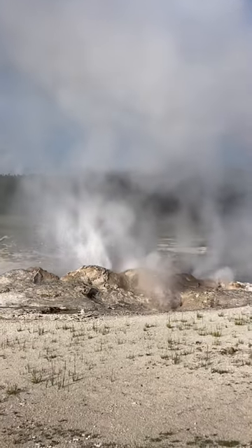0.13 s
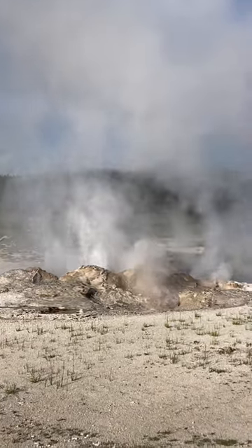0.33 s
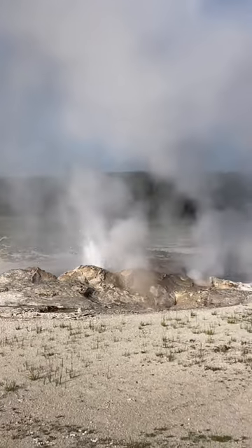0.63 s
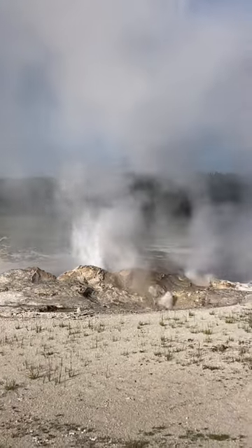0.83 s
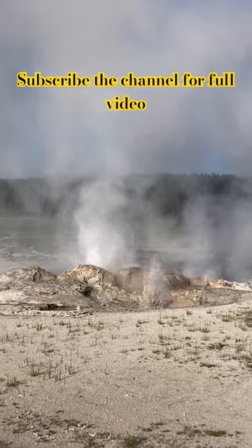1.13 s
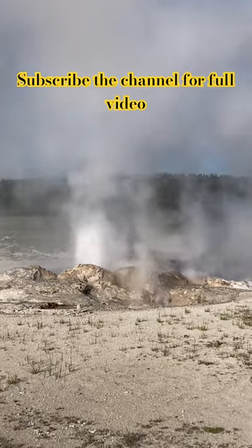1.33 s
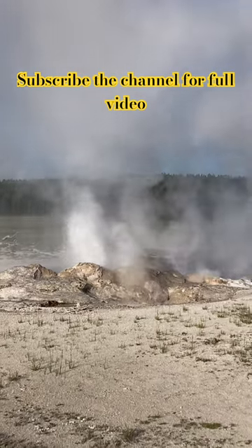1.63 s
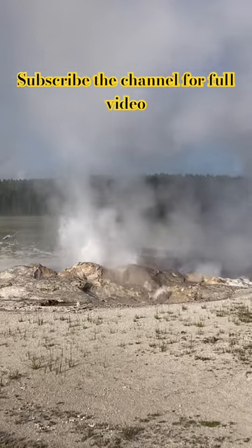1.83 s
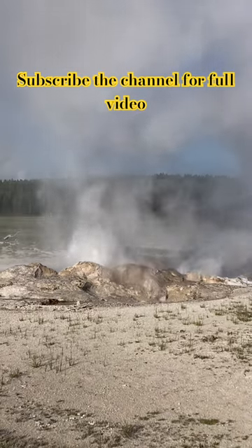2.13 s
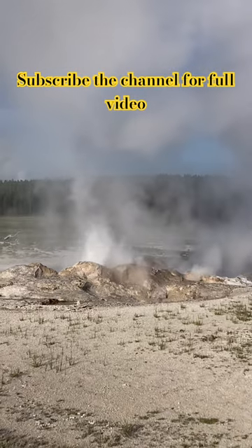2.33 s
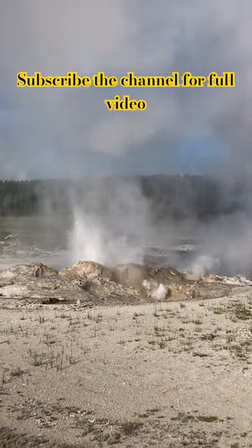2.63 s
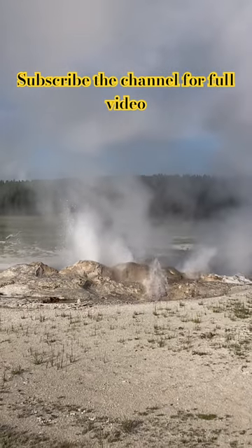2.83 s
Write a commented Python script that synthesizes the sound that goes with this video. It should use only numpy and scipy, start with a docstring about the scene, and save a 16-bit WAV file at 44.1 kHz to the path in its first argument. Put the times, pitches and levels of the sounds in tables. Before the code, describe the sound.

Geyser rumbling, gurgling and hissing at some distance on open ground, with a brief early breeze

```python
"""A deep rumble and churning gurgle under a steady hiss: a small geyser boils some way off on open ground.
Steam bubbles rumble and churn in the vent, water sloshes over its rim, and the jet and its spray hiss;
these are noise and random impulses, shaped in spectrum and level and heard by two closely spaced microphones.
Big bubbles thump and slaps of water plop as short tones; near drops tick on the crust as bursts of noise.
At first a breeze makes the bass wide; then the bass narrows to mono. Now and then the gurgle swings wide."""
import sys
import numpy as np
from scipy import signal
from scipy.fft import rfft, irfft
from scipy.io import wavfile

SR = 44100
rng = np.random.default_rng(int(sys.argv[2]) if len(sys.argv) > 2 else 0)


def transcribe(u):
    """Save the signal u as a 16-bit wav file named by the first command-line argument.

    u: samples, shape (n,) or (channels, n), limited to [-1, 1]; the rate is SR.
    q: integer samples, one column per channel.
    """
    v = np.clip(np.atleast_2d(u).T, -1, 1)
    q = np.round(v * 32767).astype(np.int16)
    wavfile.write(sys.argv[1], SR, q)


N = 132300  # samples, three seconds
FRAME = 512  # samples in each short-time spectrum of the water


def gain_of(db):
    """Decibel law: 20 dB is a factor of ten in amplitude."""
    return 10 ** (np.asarray(db) / 20)


def evened(x):
    """Power normalisation: scales to an rms of one."""
    return x / np.sqrt(np.mean(x ** 2) + 1e-20)


def read(points, hz):
    """Logarithmic frequency scale: interpolates a table evenly in pitch."""
    f, value = np.transpose(points)
    return np.interp(np.log(hz + 1), np.log(f + 1), value)


def level(table, order=1):
    """Amplitude envelope: one dB column of a time table as a gain for every sample."""
    columns = np.transpose(table)
    return gain_of(np.interp(np.arange(N) / SR, columns[0], columns[order]))


def add(mix, s, sound):
    """Superposition: adds a sound to the mix from time s in seconds."""
    part = mix[max(round(s * SR), 0):][:len(sound)]
    part += sound[:len(part)]


def patches(width_hz, length_s):
    """Correlated fluctuation: white noise smoothed over frequency and time into swelling patches."""
    z = np.fft.rfft2(rng.standard_normal((FRAME // 2 + 1, 4 * N // FRAME + 8)))
    across = np.fft.fftfreq(len(z), SR / FRAME)[:, None] * width_hz
    along = np.linspace(0, 2 * SR / FRAME, z.shape[1]) * length_s
    smoothing = 1 / (1 + (2 * across) ** 2) / np.sqrt(1 + (2 * along) ** 4)
    return evened(np.fft.irfft2(z * smoothing))


def bursts_and_rush(per_s, spread_db, grain_share):
    """Shot noise: random impulses of uneven size over Gaussian noise, shared out by power."""
    happens = rng.random(N) < per_s / SR
    size = gain_of(spread_db * np.minimum(rng.exponential(1, N), 4)) * happens
    bursts = evened(size * rng.choice([-1., 1.], (2, N)))
    rush = rng.standard_normal((2, N))
    share = np.clip(grain_share, 0, 1)
    return np.sqrt(share) * bursts + np.sqrt(1 - share) * rush


# Likeness of left and right. Each row: frequency in Hz, likeness from 0 to 1.
LIKENESS = [(30, .92), (70, .84), (220, .8), (320, .8), (430, .45), (560, .35), (800, .78), (1030, .3),
            (1250, .72), (1750, .8), (2300, .78), (2800, .45), (3700, .66), (4500, .3), (5300, .995),
            (6100, .995), (6800, .8), (7700, .995), (9000, .995), (10200, .8), (11100, .995), (12400, .995),
            (13200, .75), (14300, .995)]
# Phase between left and right. Each row: frequency in Hz, lead of the left in radians.
LEFT_LEAD = [(60, 0), (310, 0), (500, -2.6), (640, -.5), (960, -1.7), (1100, .3), (1650, .5), (2000, 1.3),
             (2650, 1.8), (2950, .1), (4400, .1), (4700, 2.5), (5300, 3.1), (6150, 3.2), (6450, 4.2),
             (7300, 5), (7700, 6.2), (9100, 6.35), (10400, 8), (11200, 9.35), (12400, 9.5), (14200, 12.5),
             (15500, 12.6)]
# Level difference of left and right. Each row: frequency in Hz, left minus right in dB.
LEFT_MINUS_RIGHT = [(60, -0.5), (330, 1), (500, -3.5), (850, 0), (1050, -7), (1400, -1.5), (2600, 0),
                    (2950, 2.5), (3400, 0.5), (4800, -0.5), (6400, 0), (15000, 0)]


def stereo_pair(a, b, hz):
    """Stereo likeness: two independent spectra blend into partly alike, offset left and right."""
    same = np.clip(read(LIKENESS, hz), 0, 1)
    tilt = gain_of(read(LEFT_MINUS_RIGHT, hz) / 2)
    right = (same * a + np.sqrt(1 - same ** 2) * b) * np.exp(-1j * read(LEFT_LEAD, hz))
    return np.array([a * tilt, right / tilt])


def water(spectrum, per_s, spread_db, grain_share, patchy_db, width_hz, length_s):
    """Stochastic superposition: small bursts over a rush, swelling in patches, in left and right."""
    x = bursts_and_rush(per_s, spread_db, grain_share)
    overlap = FRAME - FRAME // 4
    z = signal.stft(x, nperseg=FRAME, noverlap=overlap)[2]
    z = z * gain_of(patchy_db * patches(width_hz, length_s)[:, :z.shape[2]])
    patchy = signal.istft(z, nperseg=FRAME, noverlap=overlap)[1][:, :N]
    a, b = rfft(patchy)
    hz = np.fft.rfftfreq(N, 1 / SR)
    pair = stereo_pair(a, b, hz)
    return evened(irfft(pair * gain_of(read(spectrum, hz)), N))


# Deep rumble spectrum. Each row: frequency in Hz, relative density in dB per Hz.
RUMBLE_SPECTRUM = [(15, -28), (30, -17), (48, -1), (70, -0.5), (97, -1.5), (140, -5.5), (220, -19.5),
                   (400, -54), (900, -53.5)]
# Churning bubble spectrum. Each row: frequency in Hz, relative density in dB per Hz.
CHURN_SPECTRUM = [(60, -22), (110, -1), (160, 1), (240, 0.5), (300, -4.5), (370, -11.5), (450, -19),
                  (600, -14), (1000, -41)]
# Boiling strength. Each row: time in seconds, relative churn level in dB, relative rumble level in dB.
BOILING_LEVEL = [(0, -48, -46.5), (.12, -51, -45), (.25, -62, -43), (.42, -55, -49), (.6, -49, -48),
                 (.8, -48, -43.5), (1, -43, -42), (1.18, -46.5, -42), (1.27, -39, -43),
                 (1.35, -42.5, -48.5), (1.5, -44, -43.5), (1.7, -41.5, -43.5), (1.92, -46, -41),
                 (2.05, -42, -45), (2.25, -45.5, -41.5), (2.55, -43, -46), (2.85, -41.5, -41.5),
                 (3, -44.5, -41)]


def boiling():
    """Bubble noise: steam bubbles add up to a deep rumble with a churning gurgle above it."""
    rumble = water(RUMBLE_SPECTRUM, per_s=200, spread_db=1.5, grain_share=0.36,
                   patchy_db=-1.0, width_hz=230, length_s=0.2)
    churn = water(CHURN_SPECTRUM, per_s=200, spread_db=0.5, grain_share=0.56,
                  patchy_db=0.5, width_hz=990, length_s=0.068)
    deep = gain_of(2.5) * rumble * level(BOILING_LEVEL, order=2)
    return deep + gain_of(-0.7) * churn * level(BOILING_LEVEL)


# Big steam bubbles. Each row: start in seconds, pitch in Hz, length in seconds, peak level in dB.
BIG_BUBBLES = [(0.164, 82, 0.054, -34), (0.825, 152, 0.04, -38.5), (0.988, 102.4, 0.072, -38.5),
               (1.076, 233, 0.032, -39), (1.25, 108, 0.03, -33.5), (1.63, 217, 0.037, -35),
               (1.869, 62, 0.073, -42), (2.267, 92, 0.039, -31), (2.391, 146, 0.051, -31.5),
               (2.648, 210, 0.028, -37), (2.804, 90.6, 0.083, -36.5)]


def thumps(rise=0.083):
    """Bubble pulsation: a big steam bubble swells and collapses as a tone rising by a small fraction."""
    out = np.zeros(N)
    for start, hz, length, db in BIG_BUBBLES:
        u = np.arange(0, length, 1 / SR) / length  # progress from 0 to 1
        turns = np.cumsum(hz * (1 + rise * (u - .5))) / SR + rng.random()
        swell = np.sin(np.pi * u ** 1.23)
        add(out, start, gain_of(db) * swell * np.sin(2 * np.pi * turns))
    return out


# Slosh spectrum. Each row: frequency in Hz, relative density in dB per Hz.
SLOSH_SPECTRUM = [(150, -4.5), (330, -8.5), (480, -2), (630, 1), (790, 1), (930, -17.5), (1300, -15),
                  (3000, -34)]
# Slosh strength. Each row: time in seconds, relative level in dB.
SLOSHING = [(0, -57.5), (.09, -51), (.18, -58.5), (.29, -51), (.39, -55), (.46, -55), (.6, -57.5),
            (.8, -57), (.96, -57.5), (1.15, -55.5), (1.5, -57), (1.7, -54), (1.85, -56), (2.25, -54),
            (2.47, -51.5), (2.9, -53), (3, -60)]


def slosh():
    """Splash noise: water slopping over the rim sounds as patchy mid-band noise."""
    noise = water(SLOSH_SPECTRUM, per_s=200, spread_db=0.6, grain_share=0.42,
                  patchy_db=3.0, width_hz=290, length_s=0.037)
    return gain_of(1.5) * noise * level(SLOSHING)


# Water slapping back into the pool. Each row: start in seconds, pitch in Hz, relative level in dB.
SLAPS = [(.352, 356, -42), (.442, 623, -44.5), (.455, 273, -41), (.955, 689, -43.5), (1.47, 726, -48),
         (2.32, 347, -43), (2.48, 787, -48), (2.64, 524, -47.5)]
PLOP_RISE_S, PLOP_DECAY_S, PLOP_SCATTER_S = 0.0016, 0.0076, 0.02
PLOP_SPREAD = 0.1  # largest pitch offset, as a fraction


def plops(count=5):
    """Bubble resonance: each slap traps a small cluster of bubbles that ring briefly."""
    out, t = np.zeros(N), np.arange(4096) / SR
    envelope = (1 - np.exp(-t / PLOP_RISE_S)) * np.exp(-t / PLOP_DECAY_S)
    for start, hz, db in SLAPS:
        for k, (late, size) in enumerate(rng.random((count, 2))):
            pitch = hz * (1 + PLOP_SPREAD * (2 * size - 1))
            ring = np.sin(2 * np.pi * pitch * t)
            add(out, start + PLOP_SCATTER_S * (k + late) / count, gain_of(db) * envelope * ring)
    return out


# Steam jet spectrum. Each row: frequency in Hz, relative density in dB per Hz.
JET_SPECTRUM = [(400, -24), (800, 1.5), (950, -2.5), (1100, -0.5), (1400, -4.5), (1700, -.5), (2000, -7),
                (2300, 0.5), (2650, -8.5), (3000, -3), (3300, -8), (3750, -6.5), (4200, -17.5), (6000, -46),
                (12000, -25)]
# Falling spray spectrum. Each row: frequency in Hz, relative density in dB per Hz.
SPRAY_SPECTRUM = [(2000, -23), (4300, -3), (5400, 3), (6150, -3), (6500, 3.5), (7400, 1.5), (8500, 0.5),
                  (10200, 2.5), (11700, -1.5), (14000, -1.5), (15500, -7)]
# Plume strength. Each row: time in seconds, relative spray level in dB, relative jet level in dB.
PLUME_LEVEL = [(0, -59.5, -55.5), (.16, -55, -54.5), (.4, -58.5, -55.5), (.65, -58.5, -56),
               (1, -60.5, -56.5), (1.16, -63, -59.5), (1.3, -60.5, -55.5), (1.52, -61, -57.5),
               (1.75, -59, -56), (2, -59, -56), (2.23, -57, -54.5), (2.42, -60, -56), (2.7, -60, -56),
               (3, -60, -56)]


def plume():
    """Turbulence and impact noise: the steam jet rushes and its spray patters down as a fine fizz."""
    jet = water(JET_SPECTRUM, per_s=450, spread_db=1.3, grain_share=0.28,
                patchy_db=1.63, width_hz=370, length_s=0.026)
    spray = water(SPRAY_SPECTRUM, per_s=2300, spread_db=2.5, grain_share=0.33,
                  patchy_db=1.42, width_hz=1250, length_s=0.032)
    rush = gain_of(2.5) * jet * level(PLUME_LEVEL, order=2)
    return rush + gain_of(4.5) * spray * level(PLUME_LEVEL)


# Near drops. Each row: middle in seconds, pitch in Hz, bandwidth in octaves, peak level in dB.
NEAR_DROPS = [(.6395, 9400, 0.11, -45), (.7015, 8500, 0.17, -46), (0.849, 8950, 0.18, -45),
              (1.7655, 3300, .35, -41), (1.951, 2930, 0.32, -36.5), (2.116, 1690, 0.33, -40),
              (2.146, 7600, 0.11, -39.5), (2.2703, 9900, 0.55, -36), (2.5457, 8040, 0.24, -32.5)]
DROP_DECAY_S, SPLASH_DB, SPLASH_DECAY_S = 0.00069, -24, 0.005


def drops():
    """Impact noise: each near drop is a band of fast-decaying noise, a bright tick and a tiny splash."""
    out, t = np.zeros(N), np.arange(2048) / SR
    hz = np.fft.rfftfreq(len(t), 1 / SR)
    envelope = np.exp(-t / DROP_DECAY_S) + gain_of(SPLASH_DB) * np.exp(-t / SPLASH_DECAY_S)
    for middle, pitch, octaves, db in NEAR_DROPS:
        band = np.exp(-.5 * (np.log2((hz + 1) / pitch) / octaves) ** 2)
        burst = envelope * rng.standard_normal(len(t))
        tick = np.fft.fftshift(irfft(band * rfft(burst)))  # onset moved to the middle
        add(out, middle - t[-1] / 2, gain_of(db) * tick / abs(tick).max())
    return out


# Breeze spectrum. Each row: frequency in Hz, relative density in dB per Hz.
WIND_SPECTRUM = [(15, -18), (50, 5.5), (140, 6), (260, -1.5), (450, -8.5), (750, -23), (1500, -40)]
# Breeze strength. Each row: time in seconds, relative level in dB.
BREEZE_LEVEL = [(0, -52), (.09, -40), (.28, -44.5), (.45, -39), (.6, -45), (.69, -40), (.78, -44.5),
                (.93, -41), (1.15, -52), (1.5, -65)]


def wind():
    """Turbulent pressure: a lumpy breeze buffets the microphones in opposite polarity, then drops."""
    left, right = water(WIND_SPECTRUM, per_s=120, spread_db=0.5, grain_share=0.31,
                        patchy_db=2.5, width_hz=1300, length_s=0.015)
    return evened(left + right) * level(BREEZE_LEVEL) * np.array([[1], [-1]])


def scene():
    """Superposition: vent, plume and breeze, with the thumps, plops and drops in the centre."""
    return boiling() + slosh() + plume() + wind() + thumps() + plops() + drops()


# Wide moments of the gurgle. Each row: middle in seconds, length in seconds, centre in Hz, width in octaves.
WIDE_MOMENTS = [(0.146, 0.038, 507, 0.33), (.22, 0.033, 530, .8), (.26, 0.043, 355, 0.76),
                (0.404, 0.068, 570, 1.1), (0.698, 0.091, 463, 0.79), (0.804, 0.044, 347, 0.51),
                (0.87, 0.1, 430, 0.64), (.885, 0.025, 740, 0.83), (1.428, 0.037, 430, 0.76),
                (1.874, 0.08, 490, 0.75), (2.343, 0.042, 543, 0.98), (2.412, 0.039, 577, 0.5)]
# Corner below which the bass is mono. Each row: time in seconds, frequency in Hz.
MONO_CORNER = [(.72, 12), (.8, 170), (.92, 308)]


def width(stereo, size=1024, steepness=6, leak_db=-54, kept_db=-19, swing_db=-1.5):
    """Mid-side stereo: the gurgle briefly moves from centre to sides; the bass narrows to mono."""
    overlap = size - size // 4
    hz, t, (left, right) = signal.stft(stereo, SR, nperseg=size, noverlap=overlap)
    mid, side, hz = (left + right) / 2, (left - right) / 2, hz[:, None] + 1
    wide = 0
    for middle, length, centre, octaves in WIDE_MOMENTS:
        in_time = (2 * (t - middle) / length) ** 4
        in_pitch = (2 * np.log2(hz / centre) / octaves) ** 4
        wide = wide + np.exp(-in_time - in_pitch)
    kept = gain_of(kept_db * np.minimum(wide, 1))
    moved = gain_of(swing_db) * mid * np.sqrt(np.maximum(1 - kept ** 2, 0))
    mid, side = mid * kept, side + moved
    corner = np.interp(t, *np.transpose(MONO_CORNER))
    high_pass = 1 / np.sqrt(1 + abs(corner / hz) ** (2 * steepness))
    side = side * (gain_of(leak_db) + high_pass)
    return signal.istft(np.array([mid + side, mid - side]), nperseg=size, noverlap=overlap)[1][:, :N]


EDGE_HZ = 15750  # upper limit of the treble


def record(dry):
    """Linear-phase filtering: the shifting stereo width, then a steep upper band limit."""
    low_pass = signal.firwin(511, EDGE_HZ, window=("kaiser", 9), fs=SR)
    return signal.oaconvolve(width(dry), low_pass[None], "same")


dry = scene()
out = record(dry)
transcribe(out)
```